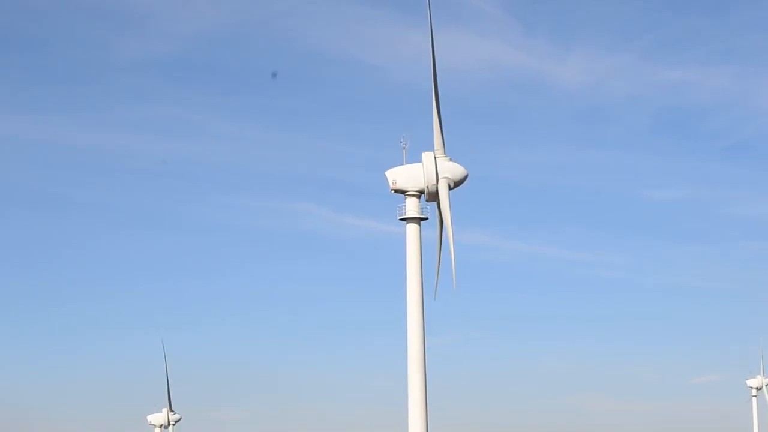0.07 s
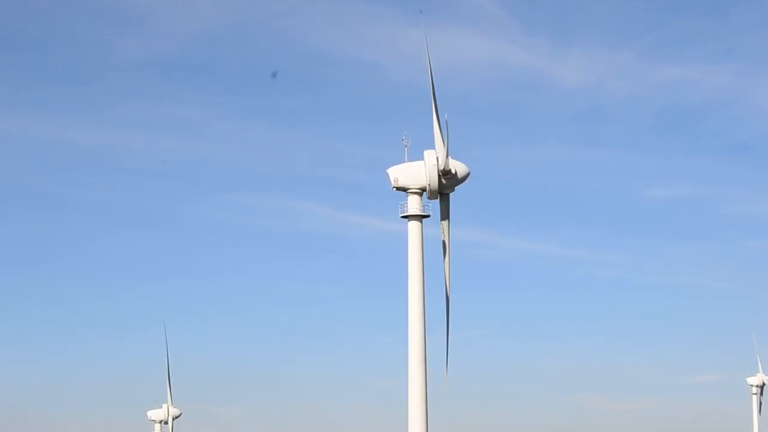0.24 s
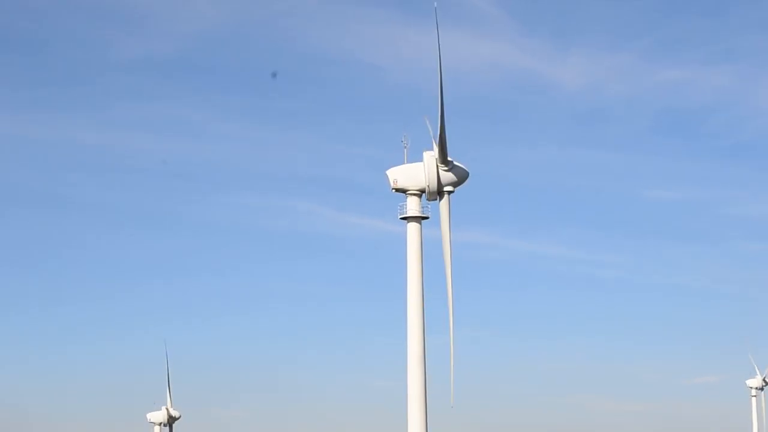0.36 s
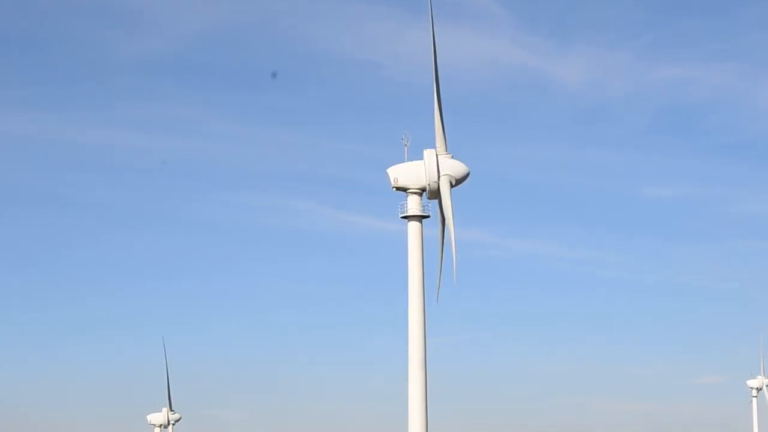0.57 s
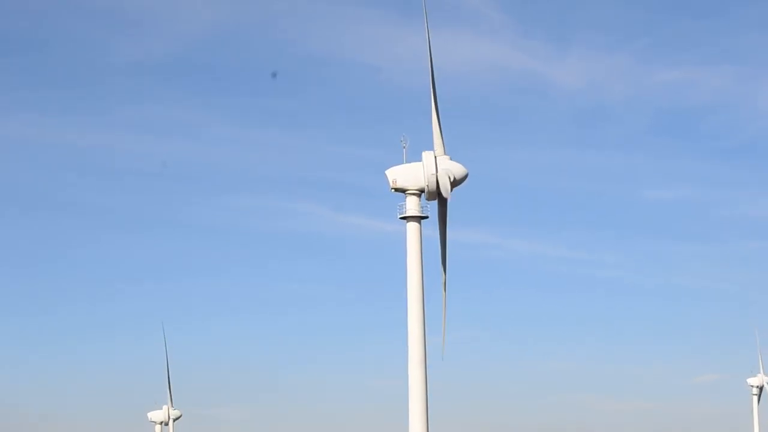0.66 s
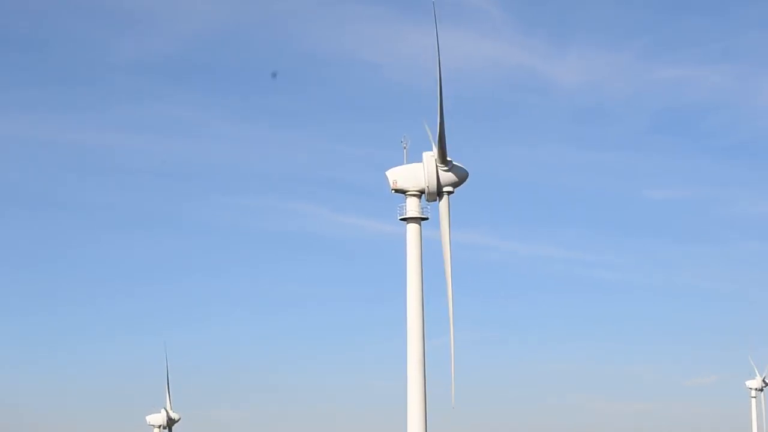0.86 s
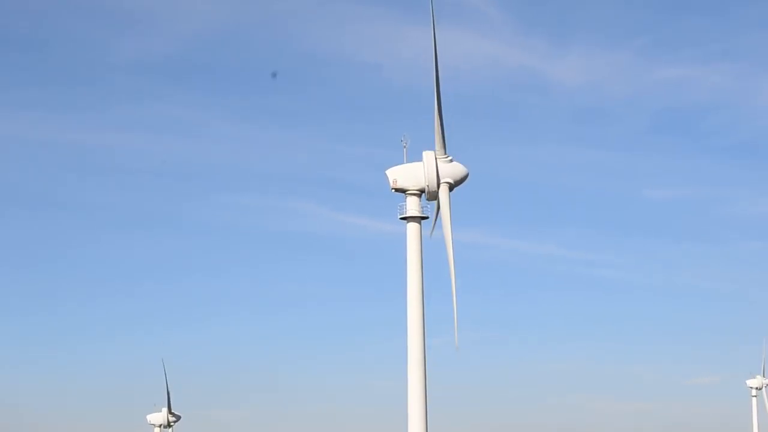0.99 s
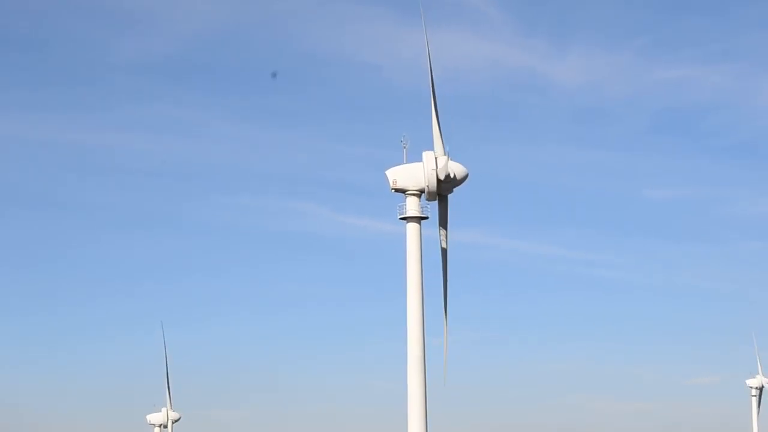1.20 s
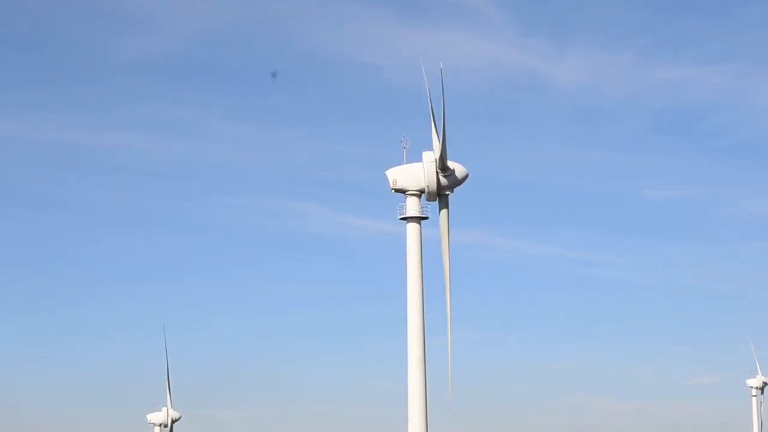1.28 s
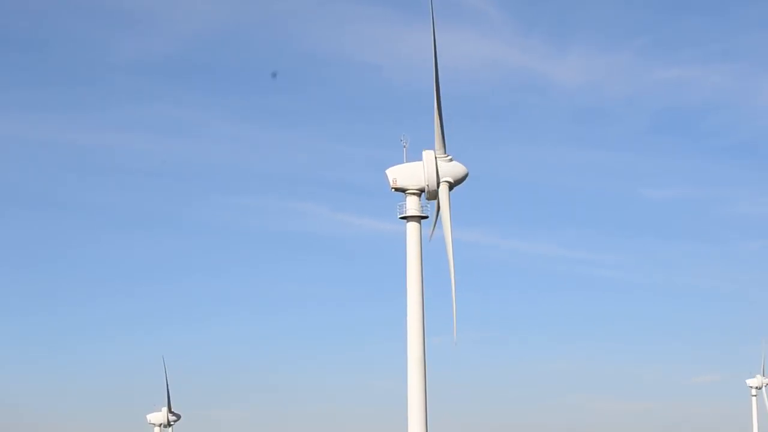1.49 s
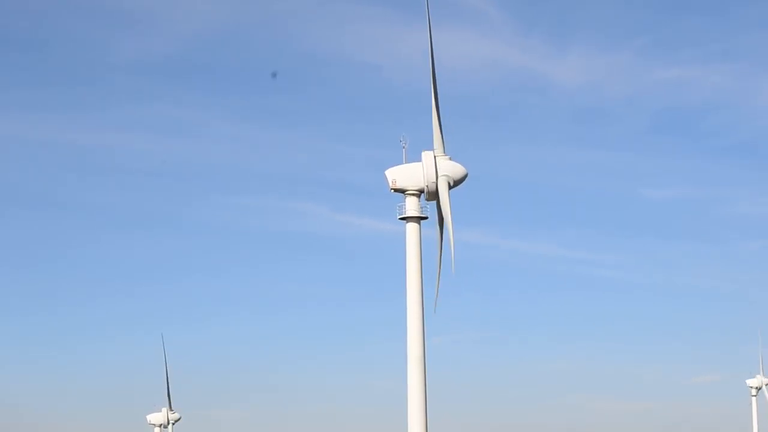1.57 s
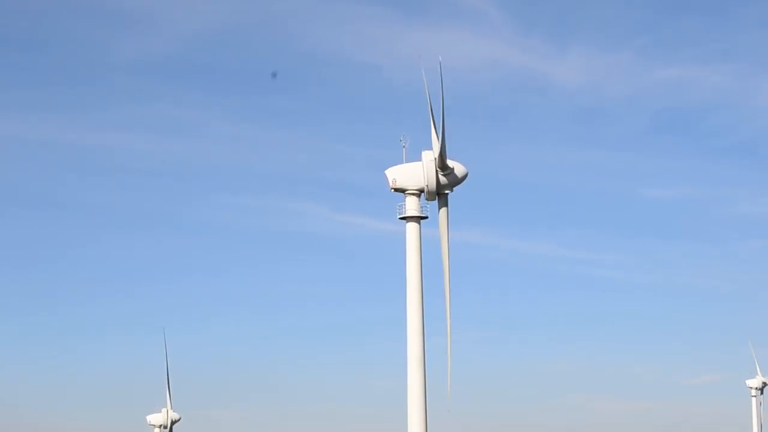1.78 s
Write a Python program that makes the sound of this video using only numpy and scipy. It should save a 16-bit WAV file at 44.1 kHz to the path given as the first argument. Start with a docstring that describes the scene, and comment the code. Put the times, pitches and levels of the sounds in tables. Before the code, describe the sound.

Rhythmic airy whooshes of turbine blades over a faint even hiss of open air, heard outdoors; wind batters the microphone early, with brief choked dropouts, and again past the middle, then calms to the swishing alone.

```python
"""Wind turbine in gusty wind

Over a steady rush of air, a blade sweeps past about twice a second: swish, rasp and hiss, each coloured
noise under its own swell, combed by one close reflection. Two gusts buffet the microphone with noise
rumble and flutter, topped by short noise bursts: turbulent eddies and one sharp click of a clipped peak.
Loud peaks clip, and in the first gust the whole sound chokes four times for a few milliseconds."""
import sys
import numpy as np
from scipy.fft import rfft, irfft, next_fast_len
from scipy.io import wavfile
from scipy.ndimage import uniform_filter1d, map_coordinates

SR = 44100
rng = np.random.default_rng(int(sys.argv[2]) if len(sys.argv) > 2 else 0)


def file_out(sig):
    """Save sig as 16-bit WAV at sys.argv[1]."""
    # one column per channel
    cols = np.atleast_2d(sig).T
    # limit, then scale
    lim = np.clip(cols, -1, 1)
    pcm = np.round(lim * 32767).astype(np.int16)
    wavfile.write(sys.argv[1], SR, pcm)


N = 81585  # length in samples

# Every spectrum gives relative levels per Hz; the noise made from it is scaled to rms 1.
# Steady rush of air, spectrum: f/Hz, level/dB
AIR_SPECTRUM = [(40, -9), (200, -2.5), (500, 0), (850, -2), (1200, -3), (1650, -1.5), (2500, -5),
                (3500, -9.5), (4500, -16.5), (6000, -19), (7900, -23.5), (8700, -18.5), (9900, -21.5),
                (11000, -37.5), (11600, -48)]
# Loudness of the rush before its slight wobble: t/s, level/dB
AIR_LEVEL = [(0, -36.5), (.45, -38.5), (.83, -38.5), (1.3, -39), (1.85, -35.5)]

# Body of the blade's noise, spectrum: f/Hz, level/dB
SWISH_SPECTRUM = [(60, -27), (250, -0.5), (500, -10), (850, 1.5), (1600, 2), (2300, -3.5), (3200, -12.5),
                  (4200, -29), (6000, -30), (11000, -45)]
# Coarse middle of the blade's noise, spectrum: f/Hz, level/dB
RASP_SPECTRUM = [(1500, -28), (2300, 6), (2800, 1.5), (3300, 1), (3700, -11), (5000, -24)]
# Bright top of the blade's noise, spectrum: f/Hz, level/dB
HISS_SPECTRUM = [(800, -23), (2500, 2), (4000, 4), (4800, 1.5), (5400, -7.5), (7000, -3), (7900, -12.5),
                 (8700, -3), (9700, -3.5), (10500, -8), (11300, -23.5)]
# Blade passes, crest before wobble and reflection: swish level/dB, rasp level/dB, hiss level/dB
BLADE_PASSES = [(-35.5, -54, -41), (-34.5, -40.5, -45), (-37, -39.5, -43.5), (-36, -55, -41)]
# Swell of swish, rasp and hiss, one row each: rise/s, fall/s, crest lag/s
BLADE_SWELLS = [(0.14, 0.092, 0.0058), (0.085, 0.045, -0.0049), (0.12, 0.093, 0.0011)]
FIRST_CREST_S, BLADE_S = 0.13, 0.4924  # first crest, time between blades
# Close reflection: mean delay, gain, swing as a share of the delay
ECHO_S, ECHO_SHARE, ECHO_DRIFT = 0.001247, 0.63, 0.0025

# Wind on the microphone, before trim and wobble: t/s, rumble level/dB, flutter level/dB
GUST_LEVELS = [(0, -38.5, -35.5), (.14, -36, -38.5), (0.211, -25, -21.5), (.28, -12, -16), (.4, -17, -12),
               (0.471, -28, -19.5), (.56, -20, -19), (.63, -41, -28), (.72, -32.5, -29), (.8, -31, -41),
               (.86, -41, -33), (.95, -35.5, -28.5), (1.03, -29.5, -37), (1.11, -38, -45),
               (1.19, -23, -18.5), (1.25, -23, -22), (1.32, -18, -31.5), (1.36, -29, -43),
               (1.4, -39.5, -45), (1.48, -37.5, -41), (1.54, -52, -65), (1.78, -54.5, -50.5),
               (1.85, -46, -32.5)]
# Low buffeting, spectrum: f/Hz, level/dB
RUMBLE_SPECTRUM = [(15, -17), (30, -10.5), (60, -4), (95, 3.5), (160, 1), (260, -12.5), (500, -14.5),
                   (1500, -57)]
# Quicker buffeting, spectrum: f/Hz, level/dB
FLUTTER_SPECTRUM = [(40, -21), (130, 3), (280, 5.5), (550, -5.5), (900, -12.5), (1300, -18.5), (2000, -25),
                    (4000, -32), (9000, -66)]
RUMBLE_DB, RUMBLE_WOBBLE_DB = -2, 2.5  # trim, wobble depth
FLUTTER_DB, FLUTTER_WOBBLE_DB = -2.5, 3.5

# Eddies hitting the microphone, and at 1.2959 s the sharp click of a clipped peak,
# before trim and skew: t/s, length/s, level/dB, brightness f/Hz
EDDIES_AND_CLICK = [(0.074, 0.021, -27.5, 250), (.188, 0.0089, -22, 405), (.255, 0.0098, -15, 760),
                    (.275, 0.0051, -2, 850), (.283, 0.0062, -6, 900), (0.3, 0.01, -13, 970),
                    (0.326, 0.016, -14.5, 1040), (.335, 0.0027, -27, 700), (.354, 0.0058, -6, 525),
                    (0.37, 0.0038, -24, 720), (.392, 0.0088, -19, 550), (0.402, 0.0058, -7, 1720),
                    (.428, 0.0055, -5.5, 610), (.435, 0.0032, -1.5, 2220), (.446, 0.013, -15, 1040),
                    (0.486, .008, -10.5, 880), (0.532, 0.0039, -8, 590), (0.538, 0.0042, -3.5, 576),
                    (0.568, 0.0049, -9.5, 610), (.584, 0.0041, -15.5, 580), (0.618, 0.0089, -21, 298),
                    (.645, 0.011, -19.5, 340), (0.675, 0.0076, -12, 430), (.687, 0.0096, -18.5, 700),
                    (0.739, 0.0036, -24, 400), (0.797, 0.012, -19, 280), (0.947, .010, -21, 470),
                    (0.971, 0.0072, -17, 420), (1.151, 0.0096, -17, 744), (1.171, 0.0076, -13.5, 830),
                    (1.182, 0.013, -14, 600), (1.204, 0.0081, 1, 600), (1.223, 0.0031, -6, 880),
                    (1.233, .006, -10.5, 745), (1.279, 0.0024, -3, 650), (1.294, 0.0067, -2, 736),
                    (1.2959, 0.00046, -16, 4440), (1.32, 0.0029, -3, 543), (1.327, 0.012, -8.5, 740),
                    (1.437, .012, -27, 223), (1.48, 0.0097, -21, 295)]
# Lower edge over brightness, steepness of the top, level trim
BURST_LOW_RATIO, BURST_SLOPE, BURST_DB = 0.21, 3.85, -1.5
BURST_SKEW = 1.224  # stretch of the rise, squeeze of the fall

# Dropouts of the choked microphone: centre t/s, length/s
MIC_CHOKES = [(0.2741, 0.0047), (0.3077, 0.0061), (.3293, 0.0038), (0.3402, 0.0037)]
CHOKE_FADE_S, CHOKE_RETURN_S = 0.00085, 0.00017
CLIP_TOP, TOP_HZ = 0.98, 11400  # clipping level (full scale 1), upper edge of the band


def amp(db):
    """Decibels to gain."""
    return 10 ** (np.asarray(db) / 20)


def unit(x):
    """Scale to rms 1."""
    return x / np.sqrt(np.mean(x ** 2) + 1e-20)


def filtered(x, response):
    """Shape x by a gain that depends on frequency."""
    size = next_fast_len(len(x) + 8192)  # padding keeps the tail from wrapping round
    hz = np.fft.rfftfreq(size, 1 / SR)
    return irfft(rfft(x, size) * response(hz), size)[:len(x)]


def noise(spectrum):
    """White noise coloured by a spectrum drawn over log frequency, at rms 1."""
    f, db = np.transpose(spectrum)

    def colour(hz):
        return amp(np.interp(np.log(hz + 1), np.log(f), db))

    return unit(filtered(rng.standard_normal(N), colour))


def wobble(rate):
    """A smooth random curve through rate knots a second."""
    knots = rng.standard_normal(1024)
    return map_coordinates(knots, [np.arange(N) * rate / SR], mode="wrap")


def evened(x, size):
    """Noise with its chance swells over size samples levelled out, at rms 1."""
    power = uniform_filter1d(uniform_filter1d(x ** 2, size), size)
    return unit(x / np.sqrt(np.abs(power) + 1e-6))


def air():
    """The wind and the farther turbines blur into an even rush of broadband noise."""
    level_db = np.interp(np.arange(N) / SR, *np.transpose(AIR_LEVEL))
    return noise(AIR_SPECTRUM) * amp(level_db + 0.4 * wobble(16.5))


def blades():
    """Each passing blade swells swish, rasp and hiss; a close reflection adds a delayed copy that combs them."""
    t = np.arange(N) / SR
    spectra = (SWISH_SPECTRUM, RASP_SPECTRUM, HISS_SPECTRUM)
    direct = np.zeros(N)
    for k, levels in enumerate(BLADE_PASSES):
        for spectrum, db, (rise_s, fall_s, lag_s) in zip(spectra, levels, BLADE_SWELLS):
            from_crest = t - FIRST_CREST_S - k * BLADE_S - lag_s
            width = np.where(from_crest < 0, rise_s, fall_s)
            swell = np.exp(-.5 * (from_crest / width) ** 2)
            direct += amp(db) * noise(spectrum) * swell
    direct *= amp(1.5 * wobble(23.83))
    # the delay swings once per blade
    swing = np.sin(2 * np.pi * (t - FIRST_CREST_S) / BLADE_S)
    delay = ECHO_S * (1 + ECHO_DRIFT * swing)
    reflection = map_coordinates(direct, [(t - delay) * SR])
    return direct + ECHO_SHARE * reflection


def gusts():
    """Wind pressure on the microphone: low rumble and a quicker flutter, both unsteady in level."""
    s, *levels = np.transpose(GUST_LEVELS)
    rumble_db, flutter_db = [np.interp(np.arange(N) / SR, s, c) for c in levels]
    rumble_db = RUMBLE_DB + rumble_db + RUMBLE_WOBBLE_DB * wobble(40.05)
    flutter_db = FLUTTER_DB + flutter_db + FLUTTER_WOBBLE_DB * wobble(90)
    rumble = evened(noise(RUMBLE_SPECTRUM), size=1200) * amp(rumble_db)
    flutter = evened(noise(FLUTTER_SPECTRUM), size=700) * amp(flutter_db)
    return rumble + flutter


def eddies_and_click():
    """Turbulent eddies, and one clipping click, as short noise bursts that end faster than they build."""
    out, size = np.zeros(N + SR), 4096
    t = (np.arange(size) - size // 2) / SR
    for s, length, db, hz in EDDIES_AND_CLICK:
        low_hz = BURST_LOW_RATIO * hz

        def band(f):
            low_cut = f ** 2 / np.hypot(f ** 2, low_hz ** 2)
            return low_cut / np.sqrt(1 + (f / hz) ** (2 * BURST_SLOPE))

        skew = np.where(t < 0, BURST_SKEW, 1 / BURST_SKEW)
        swell = np.exp(-2 * (t / length / skew) ** 2)
        burst = evened(filtered(rng.standard_normal(size), band), size=200)
        start = round(s * SR) - size // 2
        out[start:start + size] += amp(db + BURST_DB) * swell * burst
    return out[:N]


def scene():
    """The turbine and the rush of air behind the wind on the microphone."""
    return (air() + blades() + gusts() + eddies_and_click())[None]


def record(dry):
    """The overloaded microphone fades out, snaps back and clips; the recorder limits the band."""
    t, x = np.arange(N) / SR, dry[0]
    for s, length in MIC_CHOKES:
        fade = (s - length / 2 - t) / CHOKE_FADE_S + .5
        snap_back = (t - s - length / 2) / CHOKE_RETURN_S
        x = x * np.clip(np.maximum(fade, snap_back), 0, 1)
    x = np.clip(x, -CLIP_TOP, CLIP_TOP)
    # a very steep low-pass
    return filtered(x, lambda hz: 1 / np.sqrt(1 + (hz / TOP_HZ) ** 120))[None]


dry = scene()
out = record(dry)
file_out(out)
```